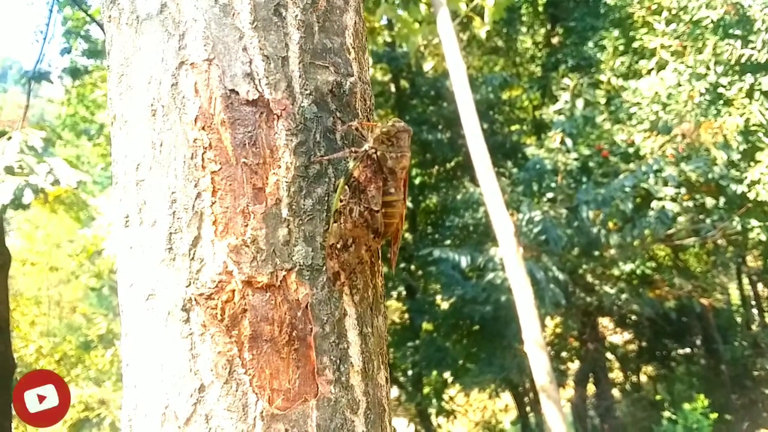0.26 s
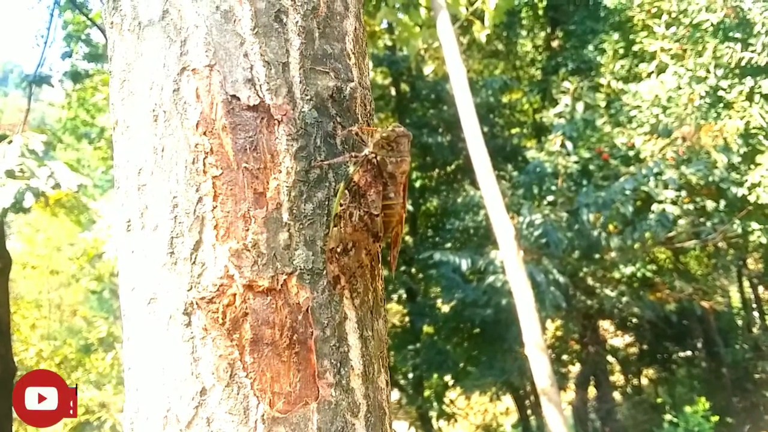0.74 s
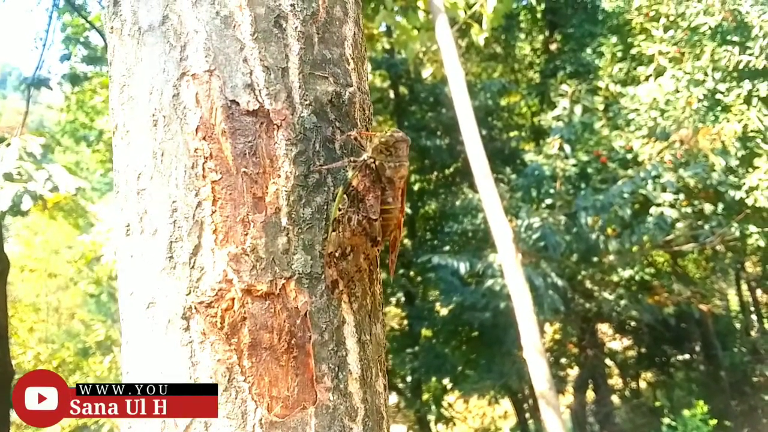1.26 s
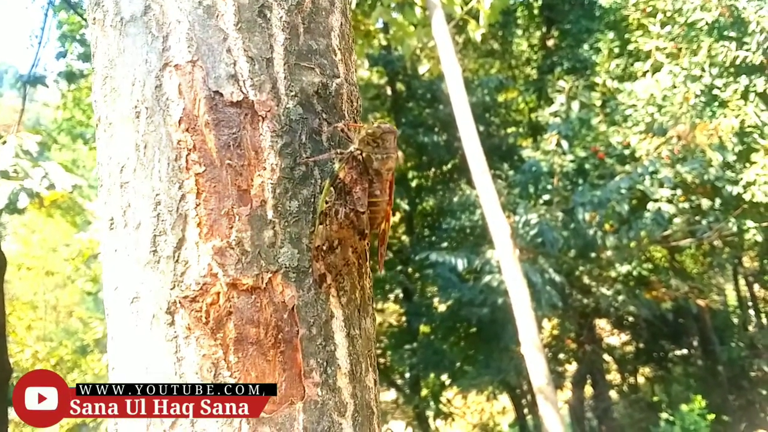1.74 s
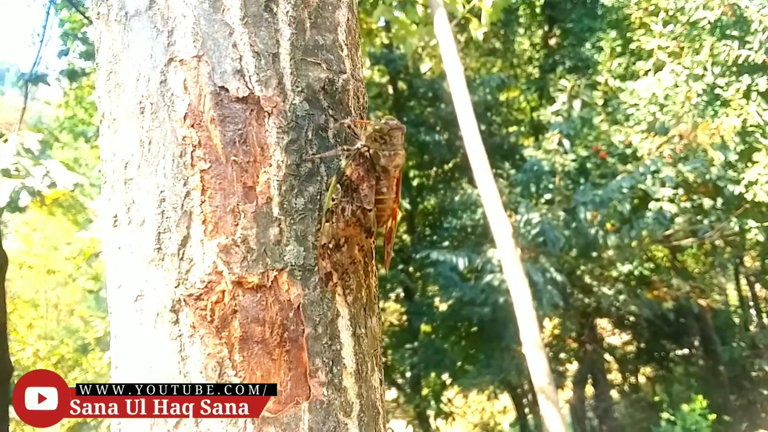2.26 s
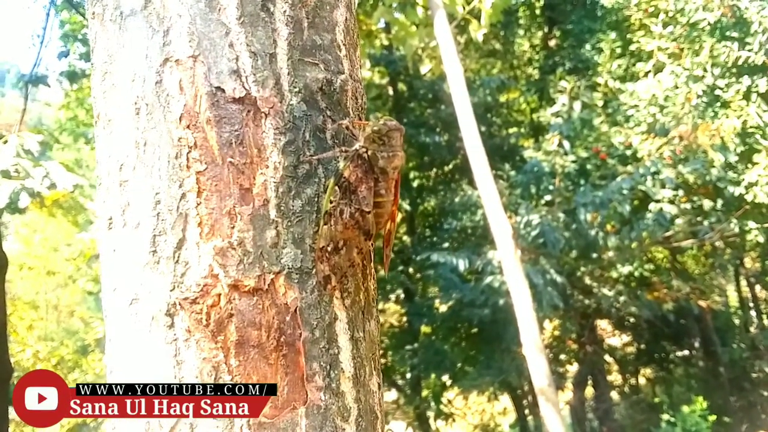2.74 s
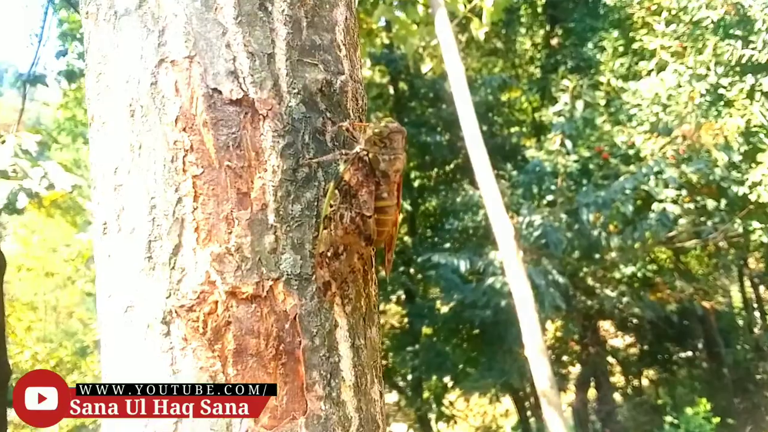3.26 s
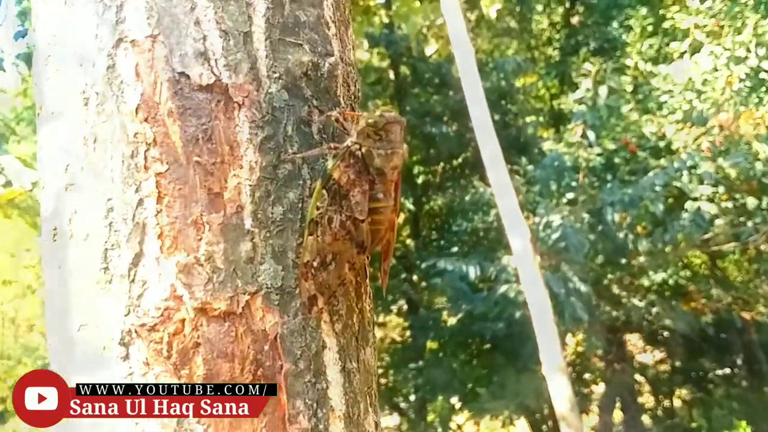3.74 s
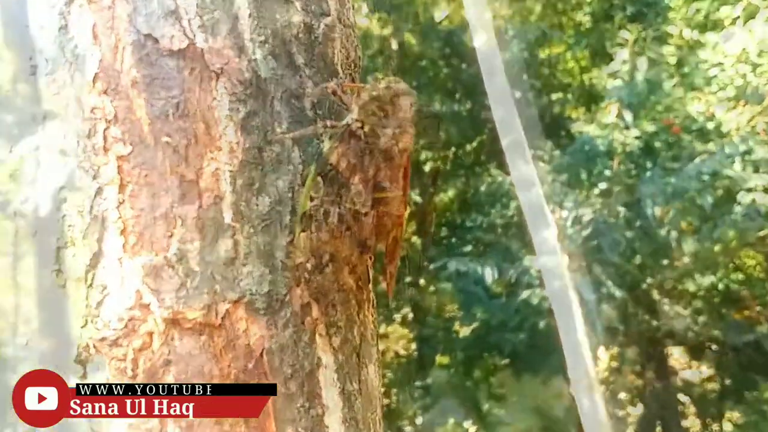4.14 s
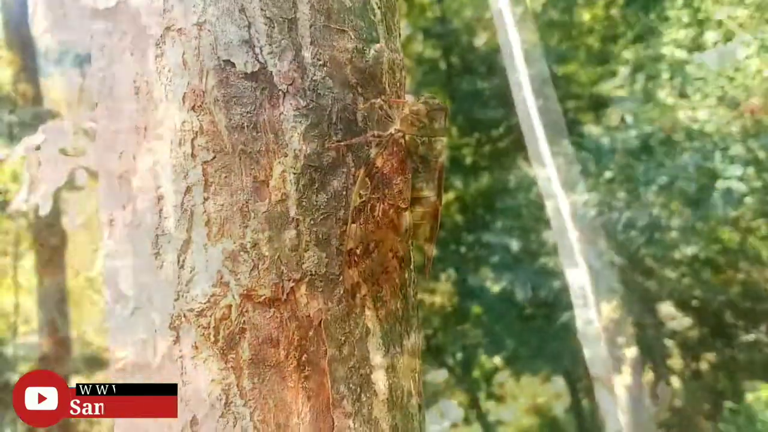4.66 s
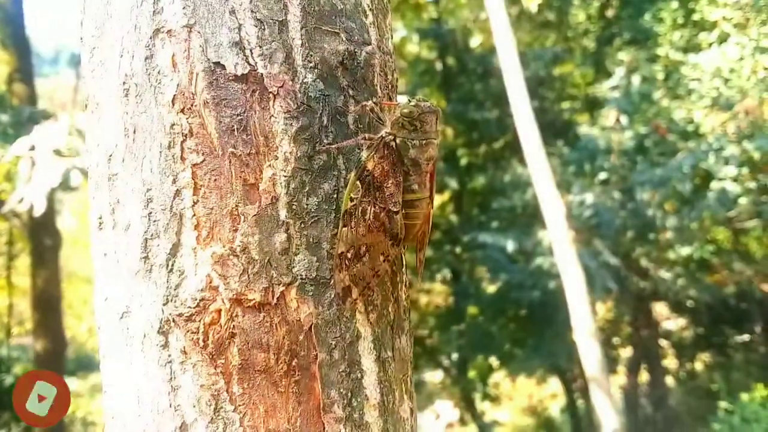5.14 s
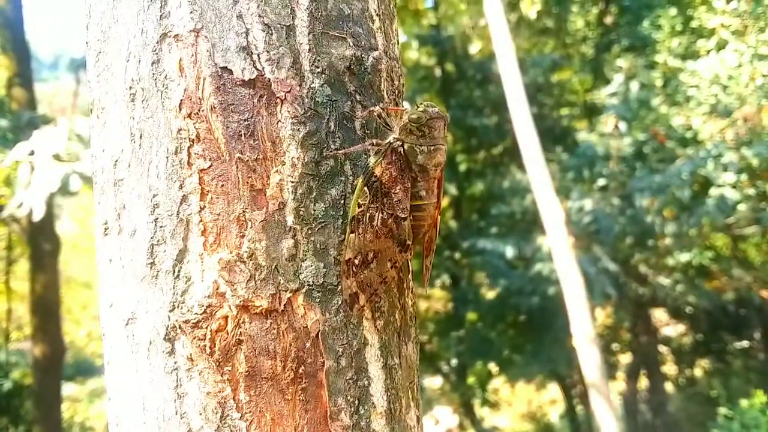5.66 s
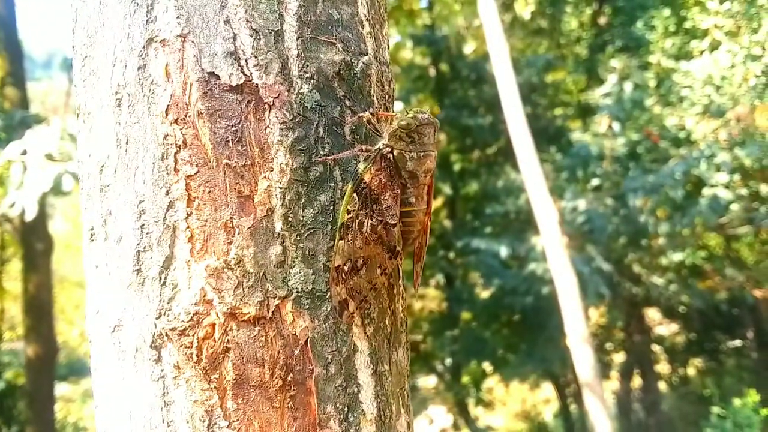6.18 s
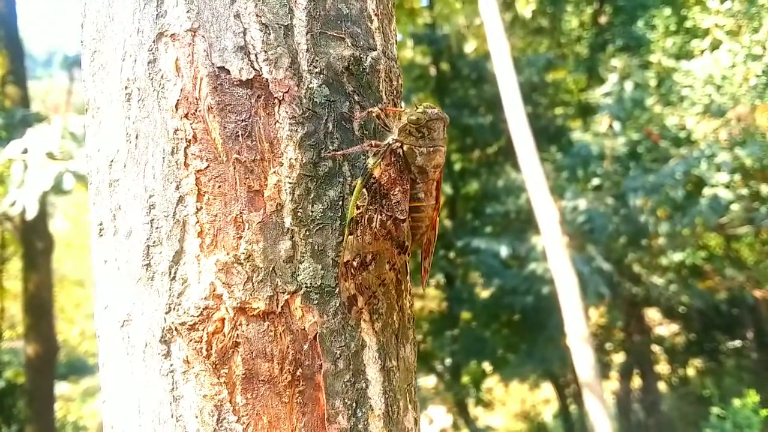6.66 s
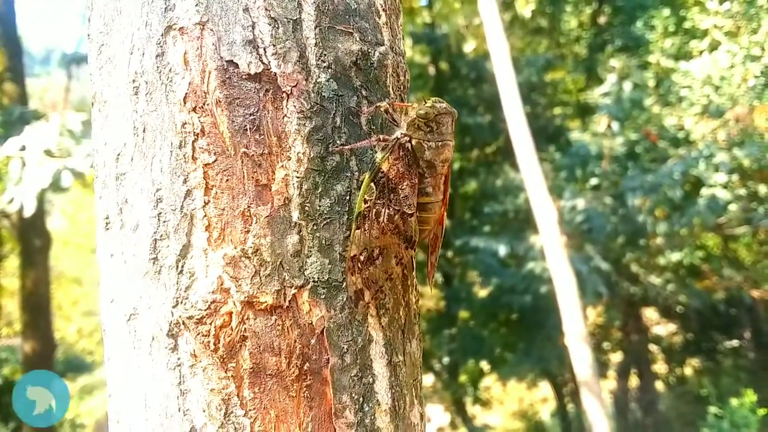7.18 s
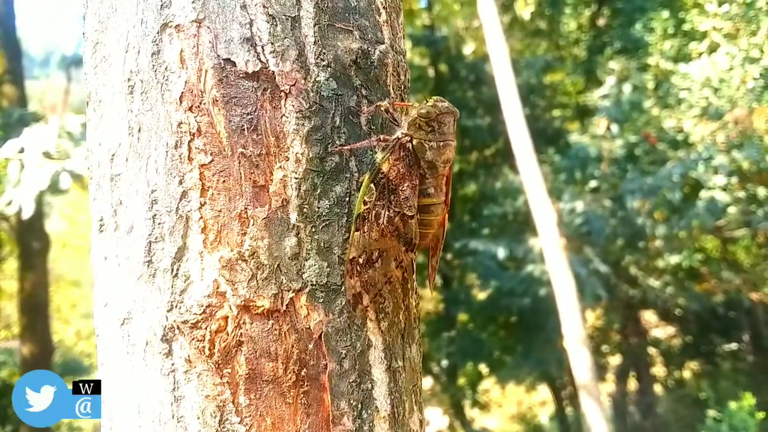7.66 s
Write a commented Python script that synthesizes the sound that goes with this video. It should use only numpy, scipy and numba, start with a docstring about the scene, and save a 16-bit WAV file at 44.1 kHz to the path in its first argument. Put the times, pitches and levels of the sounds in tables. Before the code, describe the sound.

A single cicada sings loudly on a woodland tree trunk, close to the microphone and to the left. Its shrill, high buzz speeds up and strains, breaks into a rapid throbbing, then settles back to a steady buzz. This cycle repeats several times without a pause. A thin treble fizz rides on the song, the trees echo it faintly, and a soft low rush swells underneath as the buzz quickens.

```python
"""A shrill, throbbing buzz, close on the left: a cicada on a woodland trunk, by a two-port microphone.
Its drums buckle some 500 times a second and each click rings the air sac near 5 kHz. The buzz speeds up
until the abdomen pumps 34 times a second: the ring drops in pitch, glides back up and fades before the
next stroke. Midway one stretch of the song dissolves into a later one. The trees echo it; under it lie
a faint hum, a treble fizz and a low rushing noise that swells as the buzz speeds up."""
import sys
import numpy as np
from scipy import signal
from scipy.fft import rfft, irfft, next_fast_len
from scipy.io import wavfile
from scipy.ndimage import uniform_filter1d, minimum_filter1d
from numba import njit

SR = 44100
rng = np.random.default_rng(int(sys.argv[2]) if len(sys.argv) > 2 else 0)


def materialize(psi):
    """Save the field psi as 16-bit PCM at rate SR to the path in sys.argv[1].

    A 1-D psi becomes a single channel; in a 2-D psi each row is a channel.
    """
    bounded = np.clip(np.atleast_2d(psi).T, -1, 1)
    quanta = np.round(bounded * 32767).astype(np.int16)
    wavfile.write(sys.argv[1], SR, quanta)


N = 348831

EASY_PER_S, STRAINED_PER_S = 488, 510   # the buzz strains between these click rates
TIRED_PER_S, TIRE_S = 428, .17   # in a throb the drum slows towards this rate
SAC_HZ, SAC_SAG_HZ, STRAIN_LIFT_HZ = 5152, 220, 56   # the taut ring sags in a throb, tightens with strain
# the song close to the trunk: t/s, level/dB
SONG_LEVEL = [(0.0, -9.5), (0.37, -7), (1.21, -9.5), (1.5, -6), (1.8, -7), (2.6, -9.5), (2.72, -5.5),
              (3.37, -9.5), (3.48, -7.5), (3.94, -10), (4.43, -10), (5.04, -11), (5.24, -7.5), (5.99, -9.5),
              (6.3, -7), (6.9, -6), (7.1, -6.5), (7.71, -8.5), (7.91, -7)]
# the buzzing drum, a curve for each stretch: t/s, click rate/Hz
BUZZ_RATE = [
    [(0.25, 455), (0.95, 472), (1.45, 496), (1.7, 522), (2.72, 594), (3.41, 472), (3.9, 490), (4.9, 530)],
    [(3.7, 545), (4.33, 585), (5.04, 466), (5.8, 483), (6.76, 543), (6.98, 582), (7.71, 473), (7.91, 476)],
]
# singing easy, strained, throbbing: muscle rate/Hz, second rib's level/dB, its delay/s, its pitch ratio,
# unevenness/dB, ring time constant/s, low rasp/dB
MANNERS = [(38, -13, .001, .985, .2, .00021, -45), (34.5, -10.5, .0007, .97, .7, .00022, -25),
           (34.3, -13, .0009, .98, .6, .00025, -40)]
def cicada(stretch, heard):
    """Drums click and the sac rings: stereo song, hum, fizz power and the shares of easy, strained buzz."""
    (slack, low_hz), dip_db, (throb, since_s, through) = pumping_abdomen(stretch)
    buzz_per_s = in_time(BUZZ_RATE[stretch])[0]
    per_s = buzz_per_s + throb * (TIRED_PER_S - buzz_per_s) * (1 - np.exp(-since_s / TIRE_S))
    strain = np.clip((per_s - EASY_PER_S) / (STRAINED_PER_S - EASY_PER_S), 0, 1)
    easy, strained, throbbing = np.array(MANNERS)[:, :, None]
    manner = (easy + strain * (strained - easy)) * (1 - throb) + throb * throbbing
    taut_hz = SAC_HZ - SAC_SAG_HZ * through + STRAIN_LIFT_HZ * strain
    drop_hz = slack * (taut_hz - low_hz)
    loud_db = 1.6 * (in_time(SONG_LEVEL)[0] + 7)   # brightness grows faster than the song
    glint = throb * from_db(loud_db) * np.clip(.34 + 3.8 * slack * (1 - slack), 0, 1)   # peaks mid glide
    start = drum_clicks(per_s, muscle_per_s=manner[0])
    start = start[heard[start.astype(int)] > 0]
    at = start.astype(int)
    song = air_sac(stretch, start, taut_hz[at], drop_hz[at], dip_db[at], throb[at], glint[at],
                   manner[1:, at])
    hum = heard * click_rate_hum(per_s, throb)
    fizz_power = (heard * fizz_gain(stretch, throb, strain, loud_db, dip_db)) ** 2
    effort = heard * (1 - throb) * np.array([1 - strain, strain])
    return at_ports(stretch, heard * song, through), hum, fizz_power, effort


FIRST_PULL, GAP_GROWTH_S = .56, .00005   # the first drum's share of a cycle; growth of each gap in a pull
def drum_clicks(per_s, muscle_per_s):
    """Two drums pull in turn; within a pull the ribs buckle ever more slowly. Click times in samples."""
    cycle = np.cumsum(muscle_per_s * (1 + .006 * drift(8.17))) / SR % 1
    since_s = np.where(cycle < FIRST_PULL, cycle, cycle - FIRST_PULL) / muscle_per_s
    slowing = GAP_GROWTH_S * per_s ** 2 * (since_s - uniform_filter1d(since_s, size=SR // 8))
    count = np.cumsum(per_s / (1 + slowing)) / SR
    return np.interp(np.arange(1, count[-1]), count, np.arange(N))


CLICK_JITTER_S, RING_SPREAD_HZ, SLACK_DB_PER_KHZ = .000005, 10, 6   # a slack sac is louder
LOWEST_HZ = 3200   # little of the song sounds below this
# the body as it faces the microphone in each stretch: ring time factor, second rib/dB, upper ring/dB
BODY_FACING = [(1.016, 0, -42), (0.97, -1.5, -22)]
def air_sac(stretch, start, taut_hz, drop_hz, dip_db, throb, glint, manner):
    """Each click rings the air sac; a second rib pushes the ring again, in step with it."""
    rib_db, rib_s, rib_ratio, uneven_db, ring_s, rasp_db = manner
    ring_factor, facing_db, upper_db = BODY_FACING[stretch]
    jitter, uneven, detune, rib_chance, sparkle = rng.standard_normal((len(start), 5)).T
    start = start + CLICK_JITTER_S * SR * jitter
    size = from_db(dip_db + SLACK_DB_PER_KHZ * drop_hz / 1000 + uneven_db * uneven)
    hz = taut_hz - drop_hz + RING_SPREAD_HZ * detune
    ring_s = ring_s * (1 + (ring_factor - 1) * (1 - throb))
    song = ring(start, size, hz, ring_s)
    rib_start = start + np.round(rib_s * hz) / hz * SR   # a whole number of cycles later
    rib_size = size * from_db(rib_db + facing_db * (1 - throb) + 1.1 * rib_chance)
    song += ring(rib_start, rib_size, hz * rib_ratio, 1.15 * ring_s)
    song += ring(start, size * from_db(rasp_db), hz * .82, tau_s=.0004)   # low rasp
    song += ring(start, size * (1 - throb) * from_db(upper_db), hz * 1.122, tau_s=.00021)
    song += body_rings(start, size, hz, dip_db, sparkle)
    song += overload_ticks(start, size * glint * from_db(2.5 * sparkle), hz)
    return filtered(song, LOWEST_HZ, "high", order=6)


SHELL_HZ, SHELL_DB, SHELL_S = 6830, -24, .00037   # a high ring that keeps its pitch
# other rings of the body: ratio to the main ring, level/dB, time constant/s
SIDE_RINGS = [(0.84, -33, 0.00021), (1.25, -26, 0.00055), (3.1, -70, 0.000022)]
def body_rings(start, size, hz, dip_db, sparkle):
    """The body rings faintly at other pitches with each click."""
    rings = ring(start, from_db(SHELL_DB + .55 * dip_db + sparkle), SHELL_HZ, SHELL_S)
    for ratio, db, tau_s in SIDE_RINGS:
        rings += ring(start, size * from_db(db - .084 * dip_db), hz * ratio, tau_s)
    return rings


# overload at the close microphone: ratio to the main ring, level/dB, time constant/s
OVERLOAD_TICKS = [(3.15, -17, 0.000073), (2.35, -21, 0.000046)]
def overload_ticks(start, size, hz):
    """A bright overtone and ticks on loud strokes, as the microphone overloads."""
    return sum(ring(start, size * from_db(db), hz * ratio, tau_s) for ratio, db, tau_s in OVERLOAD_TICKS)


LEAD_STROKES, FULL_STROKES = 6, 27   # faint strokes lead into a throb
LEAD_DIP_DB, LEAD_DROP_HZ, LEAD_GROWS = 5, 157, 5.8   # their dip and pitch drop grow over so many strokes
LATE_START_S, LATE_STROKES = .0097, 2.4   # the first full strokes come late and close together
SLACK_EARLY_HZ, SLACK_LATE_HZ = 3915, 3833   # the ring of the slack sac
GLIDE_FIRST_S, GLIDE_LAST_S, GLIDE_STROKES = .0052, .017, 10   # the glide back up lengthens
DIP_STROKES, DIP_EASES = 5.1, .56   # the dip deepens over so many strokes, then eases by this share
STROKE_SPREAD_DB, STROKE_SPREAD_HZ = 2.0, 50
CLOSING_HZ, CLOSING_GLIDE_S, CLOSING_DIP_DB = 4650, .017, 10   # a last shallow stroke
TIRE_AFTER_S, RECOVER_S = .08, .2
# throbs of each stretch: first stroke t/s, last full stroke t/s, dip/dB, strokes to sink in pitch
THROBS = [
    [(-0.555, 0.212, 20, 3.4), (2.605, 3.365, 31, 2.3)],
    [(4.246, 5.0, 26, 1.9), (6.911, 7.658, 28, 2.6)],
]
# the pumping dies out as a flutter: t/s after the closing stroke, dip/dB
FLUTTER = [(.027, 7.5), (.054, 0), (.081, 3), (.108, 3), (.135, 0), (.162, 1)]
def pumping_abdomen(stretch):
    """Each stroke slackens the ring, lets it glide back and is parted from the last by a dip."""
    slack, dips = [], []
    course = []   # t/s, share of throb, time in it/s, share of the way through
    count = np.arange(-LEAD_STROKES, FULL_STROKES)
    k = np.maximum(count, 0)
    lead = np.exp(np.minimum(count, 0) / LEAD_GROWS)
    early = np.exp(-k / GLIDE_STROKES)
    grown = 1 - np.exp(-(k / DIP_STROKES) ** 2)
    glides = GLIDE_LAST_S + (GLIDE_FIRST_S - GLIDE_LAST_S) * early
    late_s = LATE_START_S * np.exp(-k / LATE_STROKES)
    for first, last, depth_db, sink in THROBS[stretch]:
        detune, uneven = rng.standard_normal((len(k), 2)).T
        times = first + count * (last - first) / (FULL_STROKES - 1) + late_s
        full_hz = SLACK_LATE_HZ + (SLACK_EARLY_HZ - SLACK_LATE_HZ) * early + STROKE_SPREAD_HZ * detune
        lows = full_hz + (SAC_HZ - LEAD_DROP_HZ * lead - full_hz) * np.exp(-(k / sink) ** 2)
        full_db = depth_db * (1 - DIP_EASES * k / FULL_STROKES) + STROKE_SPREAD_DB * uneven
        depths = full_db * grown + LEAD_DIP_DB * lead * (1 - grown)
        end = last + .03
        closing = (end, CLOSING_HZ, CLOSING_GLIDE_S, CLOSING_DIP_DB)
        for s, low_hz, glide_s, dip_db in [*zip(times, lows, glides, depths), closing]:
            shape = [(-.0075, 0), (-.002, 1.06), (glide_s - .006, .85), (glide_s + .00091, 0),
                     (glide_s + .003, -.22), (glide_s + .0046, 0)]   # the glide overshoots
            slack += [(s + after_s, share, low_hz) for after_s, share in shape]
            span_s = max(glide_s, .009)
            quiet, wake = s + span_s - .019, s + 1.3 * abs(span_s - .013) - .0059
            dips += [(quiet - .013, 0), (quiet - .0065, -.22 * dip_db), (quiet, -dip_db),
                     (wake, -dip_db), (wake + .0034, -.3 * dip_db), (max(wake + .013, quiet + .022), 0)]
        for after_s, dip_db in FLUTTER:
            dips += [(end + after_s - .012, 0), (end + after_s, -dip_db), (end + after_s + .0024, 0)]
        start = first + TIRE_AFTER_S
        course += [(start, 0, 0, 0), (start + .05, 1, .05, 0), (end, 1, end - start, 1),
                   (end + .05, 0, end - start, .7), (end + RECOVER_S, 0, 0, 0)]
    return in_time(sorted(slack)), in_time(sorted(dips))[0], in_time(course)


PAN_DB, THROB_PAN_DB = [5, 7.5], 3.5   # lean to the left in each stretch; more by the end of a throb
# inverted copies off housing and bark, for each stretch: delay/s, level/dB
PORT_SHADE = [
    [(.00007, -4), (.00048, -14)],
    [(.00007, -2.5), (.00078, -13)],
]
def at_ports(stretch, song, through):
    """The left port is nearer the insect; at the right one, reflections partly cancel the song."""
    lean = from_db((PAN_DB[stretch] + THROB_PAN_DB * through) / 2)
    left, right = song * lean, song / lean
    for lag_s, db in PORT_SHADE[stretch]:
        right = right - from_db(db) * later(right, lag_s)
    return np.array([left, right])


HUM_DB, HUM_DB_PER_HZ, HUM_THROB_DB, HUM_OCTAVE_DB = -50.5, -.2, -55, -8
def click_rate_hum(per_s, throb):
    """A faint low hum at the click rate and its octave; it fades as the buzz speeds up."""
    buzz_db = HUM_DB + HUM_DB_PER_HZ * np.maximum(per_s - EASY_PER_S, 0)
    db = buzz_db * (1 - throb) + HUM_THROB_DB * throb + .5 * drift(14.0)
    phase = 2 * np.pi * np.cumsum(per_s) / SR
    return from_db(db) * np.sqrt(2) * (np.sin(phase) + from_db(HUM_OCTAVE_DB) * np.sin(2 * phase))


FIZZ_THROB_DB, FIZZ_LINGERS_S, FIZZ_STRAINED_DB = 8, .12, [1, 4.5]   # strain's lift in each stretch
def fizz_gain(stretch, throb, strain, loud_db, dip_db):
    """The fizz rises under strain and in a throb, lingers after it and dips with each stroke."""
    fall = np.arange(N) / SR / FIZZ_LINGERS_S
    lingering = np.maximum(np.maximum.accumulate(throb + fall) - fall, 0)
    throb_db = (FIZZ_THROB_DB + .34 * loud_db) * lingering
    return from_db(throb_db + FIZZ_STRAINED_DB[stretch] * strain * (1 - throb) + .4 * dip_db)


FIZZ_DB, FIZZ_TOP_HZ, FIZZ_TOP_DB = -22.5, 15600, [7, 3.7]   # the top under strain, in each stretch
# treble fizz close to the insect: f/Hz, relative density/dB
FIZZ_SPECTRUM = [(4820, 23.5), (8200, -11), (10500, -3), (12900, 2), (14900, 4), (15500, 3)]
# bands that stand out when easy, when strained: low f/Hz, high f/Hz, level/dB
FIZZ_BANDS = [(11940, 14300, -4.5), (9640, 11550, 0)]
def treble_fizz(powers, efforts):
    """Hiss under the song, a little to the left; its colour shifts with the singer's effort."""
    fizz = banded_noise(FIZZ_SPECTRUM, flicker_db=.7)
    for (low, high, db), share in zip(FIZZ_BANDS, sum(efforts)):
        fizz += share * from_db(db) * filtered(fizz, [low, high], "band")
    top = sum(strained * from_db(db) for (_, strained), db in zip(efforts, FIZZ_TOP_DB))
    fizz += top * filtered(fizz, FIZZ_TOP_HZ, "high")
    return fizz * np.sqrt(sum(powers)) * from_db(FIZZ_DB + np.array([[1.8], [-1.8]]))


# trees a few metres off: delay/s, level/dB
TREE_ECHOES = [(.011, -26), (.017, -25), (.026, -28), (.039, -27)]
def tree_echoes(song):
    """The trees throw the song back, left and right in turn."""
    echoes = np.zeros((2, N))
    for k, (lag_s, db) in enumerate(TREE_ECHOES):
        echoes[k % 2] += from_db(db) * later(song, lag_s)
    return echoes


# low rush at the microphone: f/Hz, relative density/dB
RUSH_SPECTRUM = [(15, -48), (25, -33), (75, -4.5), (189, -8), (430, -4), (475, -12), (547, -4), (884, -3.5),
                 (1080, -8), (1970, -4.5), (3000, -9), (3900, -5), (6600, -120)]
# its swells: t/s, level/dB
RUSH_LEVEL = [(0, -37.5), (1.2, -39), (1.6, -34.5), (2.7, -32), (3.1, -38), (4.3, -39), (6.1, -38.5),
              (6.35, -34.5), (6.95, -32.5), (7.45, -36.5), (7.91, -39.5)]
def low_rush():
    """A low rushing noise that swells as the buzz speeds up."""
    gain = from_db(in_time(RUSH_LEVEL)[0] + np.array([[.7], [-.7]]))
    return gain * banded_noise(RUSH_SPECTRUM, flicker_db=2.5)


# how alike the two ports hear noise: f/Hz, correlation
PORT_LIKENESS = [(60, 0.92), (290, 0.74), (640, 0.15), (1400, -0.28), (3000, -0.1), (15000, 0.07)]
def banded_noise(spectrum, flicker_db):
    """Third-octave bands of stereo noise, each with its own level, flicker and likeness; rms 1."""
    out, white = 0, rng.standard_normal((2, 2, N))
    lowest, highest = spectrum[0][0], spectrum[-1][0]
    edges = lowest * 2 ** np.arange(0, np.log2(highest / lowest) + .3, 1 / 3)
    for k, (low, high) in enumerate(zip(edges, edges[1:])):
        mid, side = filtered(white[k % 2], [low, high], "band")
        hz = np.sqrt(low * high)
        alike = at_hz(PORT_LIKENESS, hz)
        gain = from_db(at_hz(spectrum, hz) + flicker_db * drift(16.8))
        out = out + gain * (np.sqrt(1 + alike) * mid + np.sqrt(1 - alike) * side * [[1], [-1]])
    return rms_one(out)


def ring(starts, sizes, hz, tau_s):
    """One ring per click; pitch and time constant may be shared or given per click."""
    each = np.ones(len(starts))
    return sum_rings(starts, sizes, each * 2 * np.pi * hz / SR, each * tau_s * SR)


@njit
def sum_rings(starts, sizes, turns, taus):
    """Each ring swells as the cube of time, then dies away. Times in samples."""
    out = np.zeros(N)
    for k in range(len(starts)):
        first, tau = max(int(starts[k]) + 1, 0), taus[k]
        for i in range(first, min(first + int(15 * tau), N)):
            t = i - starts[k]
            out[i] += sizes[k] * (t / tau) ** 3 * np.exp(-t / tau) * np.sin(turns[k] * t)
    return out


def from_db(db):
    """dB to gain."""
    return 10 ** (np.asarray(db) / 20)


def rms_one(x):
    """Scale to rms 1."""
    return x / np.sqrt(np.mean(x ** 2) + 1e-20)


def in_time(rows):
    """Columns of a curve table at every sample."""
    s, *columns = np.transpose(rows)
    return [np.interp(np.arange(N) / SR, s, c) for c in columns]


def at_hz(points, hz):
    """A spectrum table read on a log axis."""
    freqs, values = np.transpose(points)
    return np.interp(np.log(hz), np.log(freqs), values)


def filtered(x, hz, kind, order=2):
    """A filter with a flat passband."""
    return signal.sosfilt(signal.butter(order, hz, kind, fs=SR, output="sos"), x)


def later(x, lag_s, turn=0):
    """Delay by any fraction of a sample, with a constant turn of phase."""
    size = next_fast_len(N + SR)
    hz = np.arange(size // 2 + 1) * SR / size
    return irfft(rfft(x, size) * np.exp(-2j * np.pi * hz * lag_s - 1j * turn), size)[:N]


def drift(hz):
    """A slow random wander of rms 1."""
    pole = np.exp(-80 * np.pi * hz / SR)
    slow = signal.lfilter([1], [1, -2 * pole, pole * pole], rng.standard_normal(N // 40 + 2002))[2000:]
    return np.interp(np.arange(N) / 40, np.arange(len(slow)), rms_one(slow))


DISSOLVE_FROM_S, DISSOLVE_TO_S = 3.8, 4.96
PORT_LAG_S, PORT_TURN_RAD, PORT_DB = .00014, .8, -5   # the right port: later, turned in phase, softer
QUIET_FROM_S, QUIET_TO_S, QUIET_DB = 3.19, 5.172, -3   # the whole level steps down and back
def scene():
    """The song at the two ports, with echoes off the trees, over hum, fizz and a low rush."""
    s = np.arange(N) / SR
    level = from_db(in_time(SONG_LEVEL)[0])
    second = np.interp(s, [DISSOLVE_FROM_S, DISSOLVE_TO_S], [0, 1])
    songs, hums, fizz_powers, efforts = zip(cicada(0, heard=1 - second), cicada(1, heard=second))
    left, right = level * sum(songs)
    direct = np.array([left, later(right, PORT_LAG_S, PORT_TURN_RAD) * from_db(PORT_DB)])
    echoes = tree_echoes((left + right) / 2)
    rush = np.hypot(second, 1 - second) * low_rush()   # sinks a little in the dissolve
    fizz = level * treble_fizz(fizz_powers, efforts)
    quiet = (s > QUIET_FROM_S) & (s < QUIET_TO_S)
    return (direct + echoes + sum(hums) + rush + fizz) * from_db(QUIET_DB * quiet)


LIMIT, LIMIT_HOLD_S = .92, .004
CUBE_DB, CEILING, CUTOFF_HZ = -23, .8, 15480   # the microphone's bend, largest swing and treble limit
def record(dry):
    """A fast limiter holds the peaks; the microphone bends and rounds large swings; the top is cut."""
    hold = int(LIMIT_HOLD_S * SR)
    gain = minimum_filter1d(LIMIT / np.maximum(np.abs(dry).max(axis=0), LIMIT), size=hold)
    held = dry * uniform_filter1d(gain, size=hold // 2)
    bent = held - from_db(CUBE_DB) * held ** 3   # adds a third harmonic
    rounded = bent / (1 + (bent / CEILING) ** 8) ** (1 / 8)
    return signal.sosfilt(signal.ellip(12, .5, 90, CUTOFF_HZ, fs=SR, output="sos"), rounded)


dry = scene()
out = record(dry)
materialize(out)
```